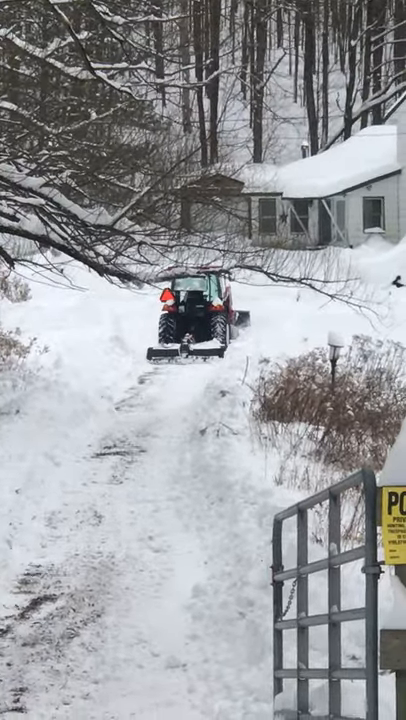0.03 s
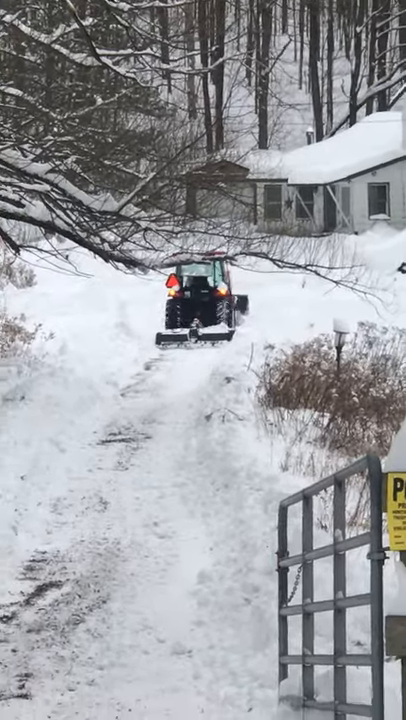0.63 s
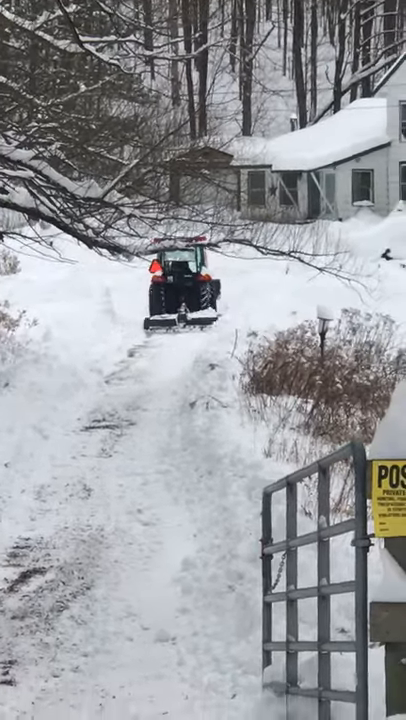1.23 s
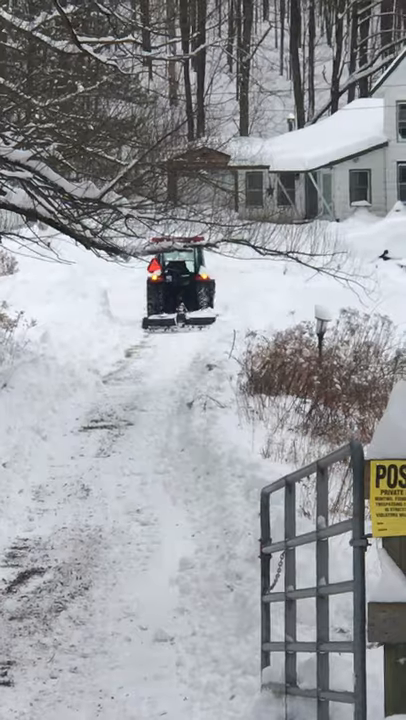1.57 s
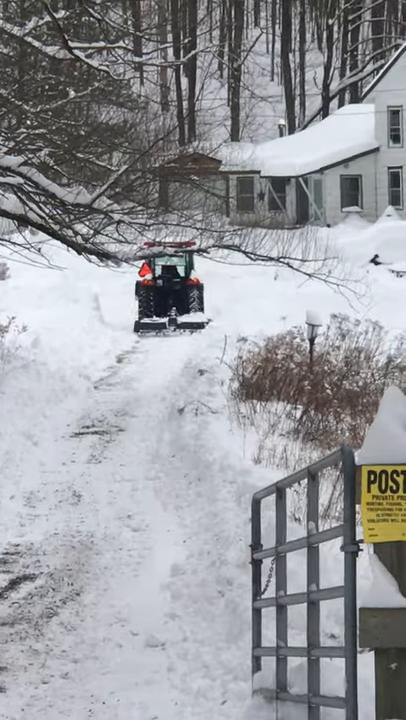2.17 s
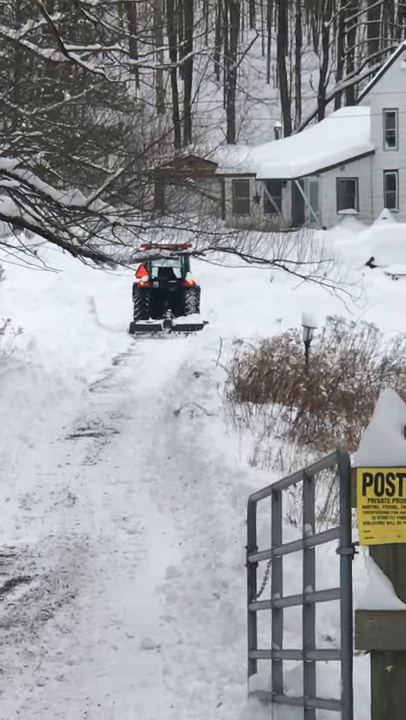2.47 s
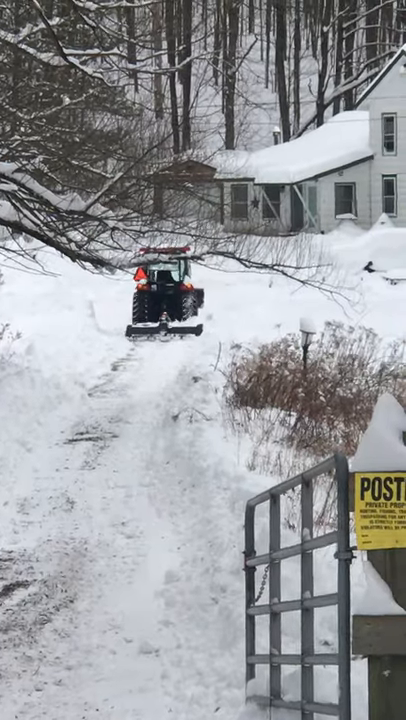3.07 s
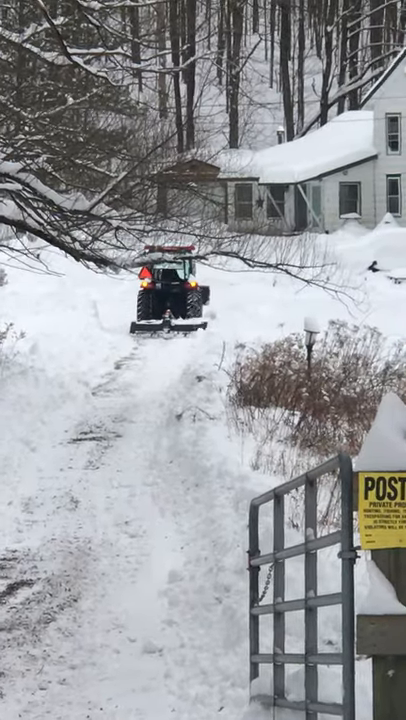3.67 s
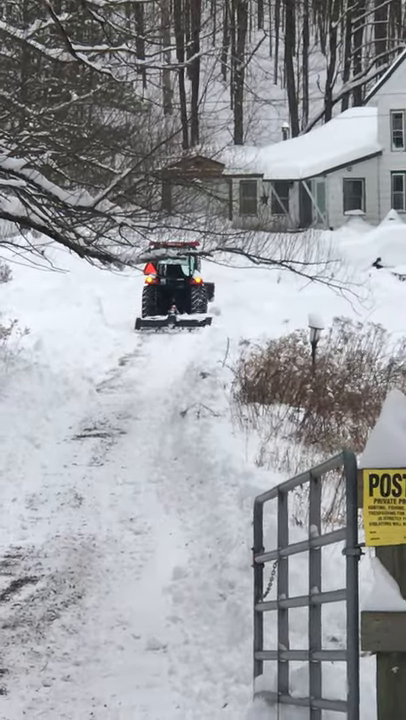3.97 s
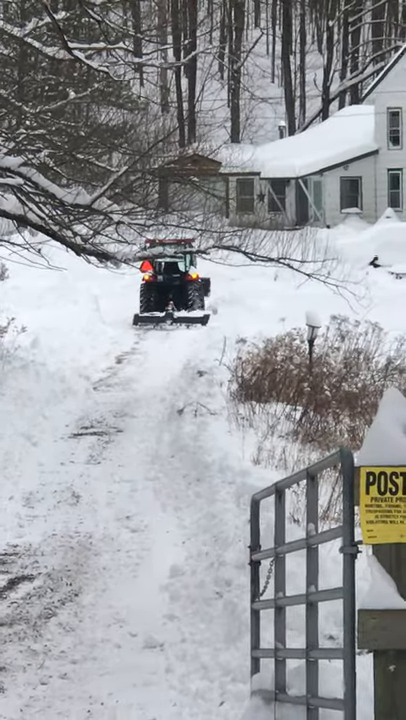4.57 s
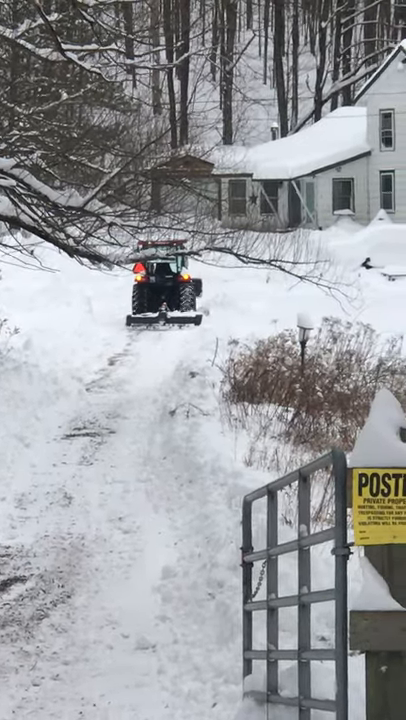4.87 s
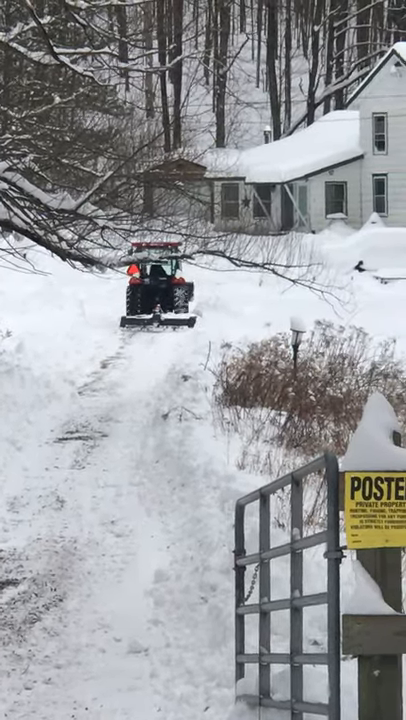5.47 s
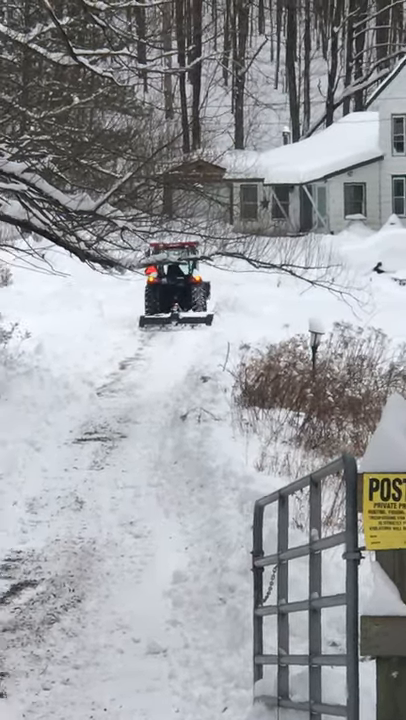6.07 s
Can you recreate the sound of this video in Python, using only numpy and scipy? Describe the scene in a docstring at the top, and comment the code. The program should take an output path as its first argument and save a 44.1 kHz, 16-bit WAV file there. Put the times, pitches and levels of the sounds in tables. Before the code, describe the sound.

Low wind buffets the microphone as a tractor engine chugs and clatters evenly, far off in the snow.

```python
"""A snowy drive by the woods, one microphone out in a light wind.
Far off, a diesel tractor crawls up at a steady speed: exhaust throb, engine clatter, faint gear whine.
Right at the microphone the wind rumbles, and now and then an eddy bumps it.
Behind it lies an even hiss with a few tiny ticks, as of snow grains landing close by."""
import sys
import numpy as np
from scipy.fft import rfft, irfft, next_fast_len
from scipy.io import wavfile
from scipy.ndimage import map_coordinates

SR = 44100
rng = np.random.default_rng(int(sys.argv[2]) if len(sys.argv) > 2 else 0)


def output_pcm(signal):
    """Save a mono or channel-first signal as 16-bit PCM at the path in sys.argv[1].

    Samples are clipped to [-1, 1] before scaling.
    """
    pcm = np.clip(np.atleast_2d(signal).T, -1, 1) * 32767
    wavfile.write(sys.argv[1], SR, np.round(pcm).astype(np.int16))


N = 277830

# exhaust note at 1, 2, 3 .. times the firing rate: rms level/dB
EXHAUST_HARMONICS = [-44, -44, -47, -47.5, -49.5, -63.5, -58.5, -76, -57.5, -84, -66]
# gear whines: f/Hz, rms level/dB
GEAR_WHINES = [(726.6, -67), (787.3, -65), (1453.2, -74)]
# engine clatter as heard from afar: f/Hz, relative level/dB
CLATTER_SPECTRUM = [(100, 2.5), (300, -5), (420, 1.5), (525, -4), (630, -0.5), (900, -2), (1200, -3.5),
                    (1650, -9), (2050, -8.5), (2700, -11), (4000, -17.5), (7000, -40)]
# ringing (+) and hollows (-) of the engine block and panels: f/Hz, width/Hz, lift/dB
PANEL_RESONANCES = [(520, 48, -5.5), (707, 69, 3), (760, 36, -6), (822, 54, 2.5), (1216, 53, -5),
                    (1305, 90, 6.5), (1410, 40, 1), (1552, 75, 4), (1820, 58, 4), (1980, 90, -3.5),
                    (2520, 120, 2.5)]
# wind on the microphone: f/Hz, relative level/dB
RUMBLE_SPECTRUM = [(20, -22), (32, -24), (48, -5), (68, 2.5), (110, -4), (190, -3.5), (225, -10),
                   (310, -13.5), (420, -22), (600, -29.5), (1500, -65)]
# the rumble as the breeze rises and falls: t/s, rms level/dB
BREEZE_LEVELS = [(0, -36), (.85, -34.5), (1.2, -36), (2.85, -34.5), (3.3, -36), (4.4, -36.3), (4.7, -34),
                 (5.9, -35.5), (6.3, -33.5)]
# background hiss: f/Hz, relative level/dB
HISS_SPECTRUM = [(300, -10), (2000, -5.5), (4400, -2), (5550, -3.5), (6200, 0), (6950, -2), (8300, -1),
                 (8900, -7), (9600, -10.5), (10100, -15.5), (10450, -19.5), (11600, -19.5), (13300, -29),
                 (15700, -35)]
# narrow resonances (+) and hollows (-) that tint the hiss: f/Hz, width/Hz, lift/dB
HISS_RESONANCES = [(3320, 150, 3.5), (4020, 92, 3.5), (4190, 110, -1.5), (4325, 62, 5.5), (4530, 60, 2),
                   (4670, 60, 1), (6510, 260, 4), (7530, 220, 4), (8100, 160, 2.5), (9380, 170, 4)]
# eddies that bump the microphone: t/s, peak level/dB, f/Hz
EDDY_BUMPS = [(0.471, -24, 195), (.504, -19, 97), (.902, -26, 190), (1.715, -16, 124), (1.96, -24, 81),
              (2.001, -23, 166), (2.098, -20, 202), (2.729, -17, 65), (2.744, -18, 124), (2.908, -21.5, 77),
              (3.79, -24, 69), (4.151, -24, 92), (4.607, -24.5, 169), (5.267, -25.5, 140),
              (5.683, -16.5, 73.4), (5.796, -23, 128)]
# the clearest ticks close by: t/s, starting level/dB
CLEAR_TICKS = [(1.322, -44.5), (1.567, -41), (2.639, -41.5), (2.9223, -38.5), (3.0278, -43), (3.4595, -43),
               (3.728, -39), (5.4345, -43), (5.4744, -42.5), (5.5394, -42), (5.5977, -43)]
# colour of a tick: f/Hz, relative level/dB
TICK_SPECTRUM = [(2000, -27), (4500, -5), (6500, 11), (8200, 4), (9500, -5), (11000, -17), (15000, -36)]


def amp(db):
    """Decibels to gain."""
    return 10 ** (np.asarray(db) / 20)


def unit(x):
    """Scale to rms 1."""
    return x / np.sqrt(np.mean(x ** 2) + 1e-20)


def wobble(rate):
    """A smooth random curve, `rate` knots a second."""
    knots = rng.standard_normal(int(N * rate / SR) + 4)
    return map_coordinates(knots, [np.arange(N) * rate / SR], mode="nearest")


def filtered(x, response):
    """Apply a gain that depends on frequency."""
    size = next_fast_len(N + SR // 2)
    hz = np.fft.rfftfreq(size, 1 / SR)
    return irfft(rfft(x, size) * response(hz), size)[..., :N]


def noise(spectrum, resonances=()):
    """Noise of rms 1 with a broad colour, lifted or hollowed at each resonance."""
    def response(hz):
        points_hz, points_db = np.transpose(spectrum)
        colour_db = np.interp(np.log(hz + 1), np.log(points_hz + 1), points_db)
        lift_db = sum(db / (1 + (2 * (hz - centre) / width) ** 2) for centre, width, db in resonances)
        return amp(colour_db + lift_db)
    return unit(filtered(rng.standard_normal(N), response))


def tone(cycles, flutter_db):
    """A sine of rms 1 that flutters on its way through moving air to the microphone."""
    return unit(np.sin(2 * np.pi * (cycles + rng.random())) * amp(flutter_db * wobble(4.01)))


def tractor(firing_hz=35.0):
    """Far off, one governed shaft drives the exhaust, the gears and the clatter."""
    speed = 1 + 0.0012 * wobble(2)
    shaft_time = np.cumsum(speed) / SR
    firings = firing_hz * shaft_time
    exhaust = sum(amp(db) * tone(order * firings, flutter_db=0.5)
                  for order, db in enumerate(EXHAUST_HARMONICS, 1))
    gears = sum(amp(db) * tone(hz * shaft_time, flutter_db=2.5) for hz, db in GEAR_WHINES)
    # distance and the woods smear the knocks, so only a shallow pulsing is left
    knocks = amp(0.33 * np.cos(2 * np.pi * firings) + 0.5 * wobble(5.06))
    clatter = amp(-45) * unit(knocks * noise(CLATTER_SPECTRUM, PANEL_RESONANCES))
    return exhaust + gears + clatter


def wind():
    """Turbulence right at the microphone port: a lumpy rumble that follows the breeze."""
    breeze_db = np.interp(np.arange(N) / SR, *np.transpose(BREEZE_LEVELS))
    lumps = amp(1.3 * wobble(9.3) + 0.75 * wobble(55))
    return amp(breeze_db) * unit(lumps * noise(RUMBLE_SPECTRUM))


def hiss(level_db=-49.5):
    """An even, bright hiss in the background, with a faintly ringing colour."""
    return amp(level_db) * noise(HISS_SPECTRUM, HISS_RESONANCES)


def eddies(half_length_cycles=0.86):
    """Each eddy swings the pressure at the microphone once or twice; big, slow ones last longer."""
    t, bumps = np.arange(N) / SR, np.zeros(N)
    swirl = noise([(40, -28), (120, -10), (230, 6), (380, -0.5), (600, -20.5), (1500, -64)])
    for peak_s, db, hz in EDDY_BUMPS:
        near = abs(t - peak_s) < 0.1
        cycles = hz * (t[near] - peak_s)
        envelope = amp(db) * np.exp(-(cycles / half_length_cycles) ** 2)
        swing = np.sin(2 * np.pi * (cycles + rng.random()))
        turbulence = hz / 560 * swirl[near]  # small, quick eddies shed more
        bumps[near] += envelope * (swing + turbulence)
    return bumps


def ticks(attack_s=0.00061, t60_s=0.048, faint_per_s=1.8, faint_db=-47, spread_db=3):
    """Close by, brief, crisp sprays of tiny grains; faint ones fall at random among the clear ones."""
    t, envelope = np.arange(N) / SR, np.zeros(N)
    spray = unit(noise(TICK_SPECTRUM) * amp(wobble(1200)))
    faint_ticks = [(rng.uniform(0, N / SR), faint_db + rng.uniform(-spread_db, spread_db))
                   for _ in range(round(faint_per_s * N / SR))]
    for start_s, db in CLEAR_TICKS + faint_ticks:
        age = np.maximum(t - start_s, 0)
        envelope += amp(db - 60 * age / t60_s) * (1 - np.exp(-age / attack_s))
    return envelope * spray


def scene():
    """The far tractor and the near air at one microphone."""
    return (tractor() + wind() + hiss() + eddies() + ticks())[None]


def record(dry):
    """The recorder cuts the deepest bass and keeps nothing above its band limit."""
    low_cut_hz, top_hz = 27, 15800
    return filtered(dry, lambda hz: (1 - np.exp(-(hz / low_cut_hz) ** 6)) * (hz < top_hz))


dry = scene()
out = record(dry)
output_pcm(out)
```